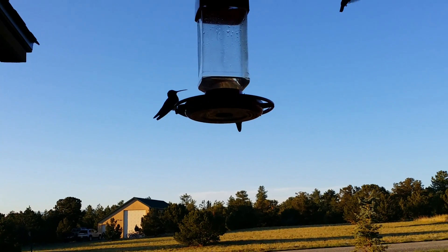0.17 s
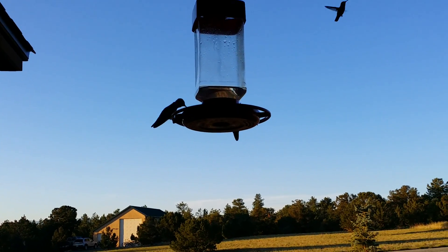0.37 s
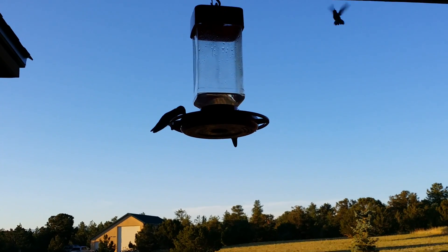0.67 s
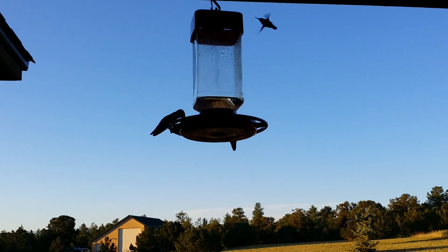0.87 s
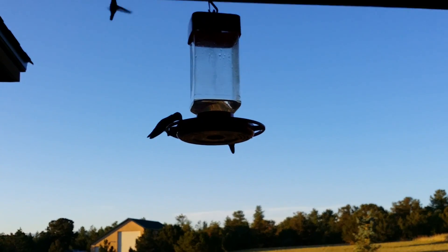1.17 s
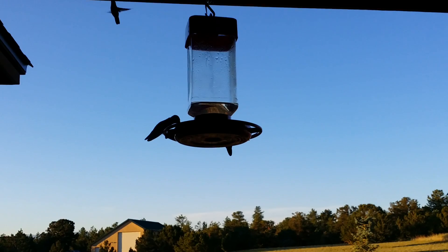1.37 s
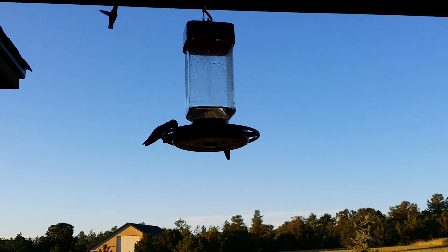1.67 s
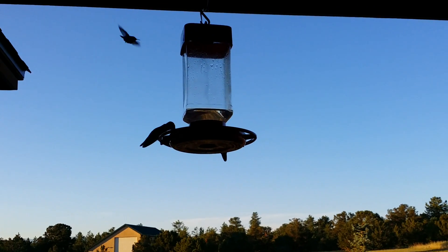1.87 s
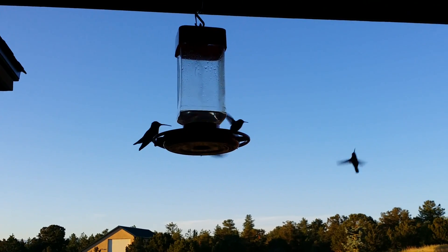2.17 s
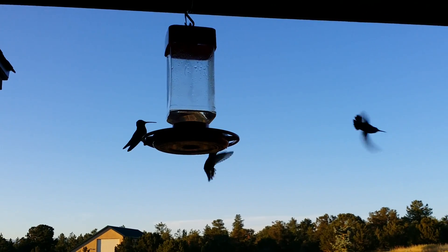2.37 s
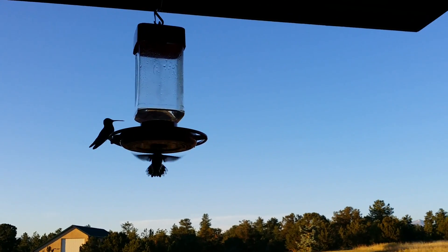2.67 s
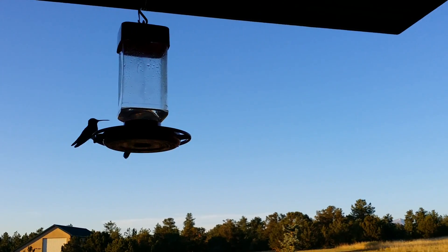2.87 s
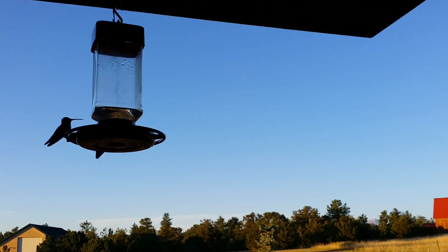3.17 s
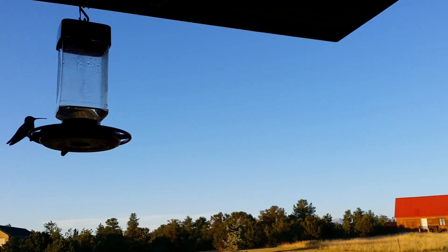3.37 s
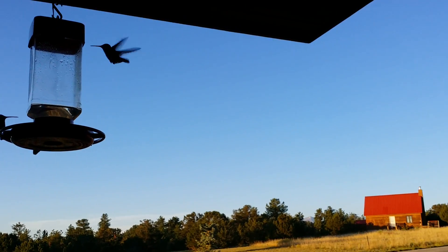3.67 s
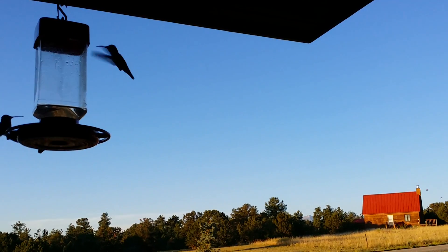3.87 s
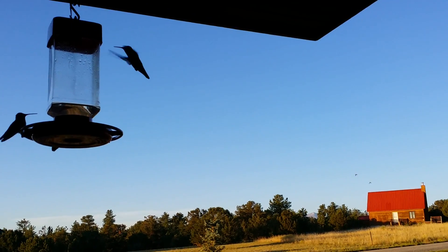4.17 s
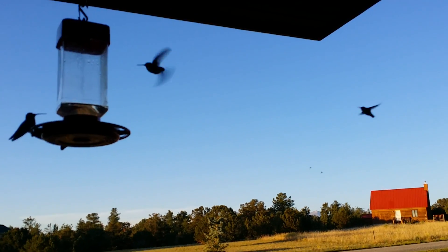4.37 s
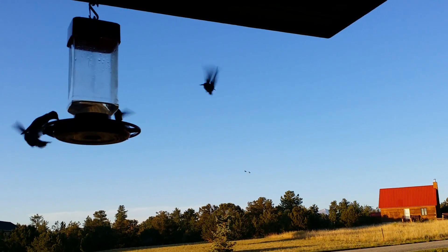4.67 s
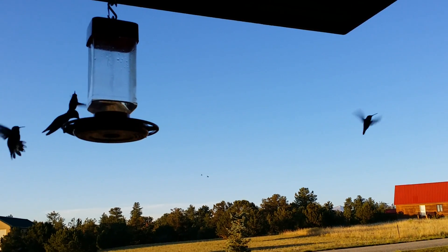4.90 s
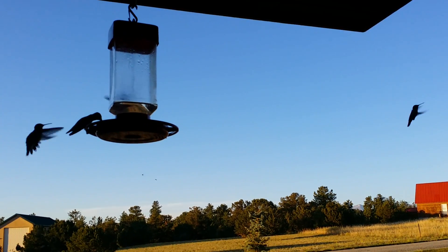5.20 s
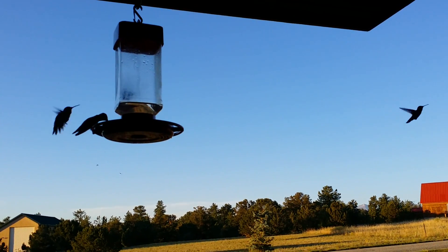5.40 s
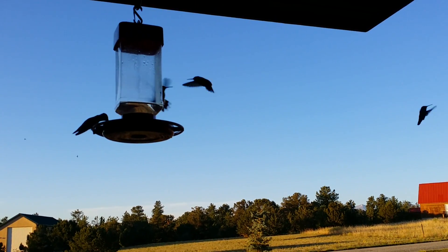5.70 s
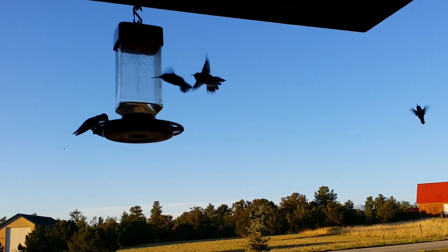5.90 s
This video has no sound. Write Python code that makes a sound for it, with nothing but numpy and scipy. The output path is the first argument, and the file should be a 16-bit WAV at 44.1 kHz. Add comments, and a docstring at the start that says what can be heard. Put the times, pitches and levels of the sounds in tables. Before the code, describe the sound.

Several hummingbirds circle a feeder under a porch, heard close in stereo. At first the wing hum is fairly faint, a low buzzing throb near 50 beats a second, with small chips; it swells around 0.7 s as louder chips and buzzy trills begin, thickest from 0.65 to 1.75 s. The hum sinks near 1.8 s, then surges close at 2 s with a barely noticeable dull knock at 2.1 and gritty trills to 2.3. Bright falling chips follow at 2.65 and 2.8, with weaker ones after 3. The hum dips near 3.3, darts up at 3.45, then calls grow sparse. Two strong chips come at 4.35, tiny wing flicks at 4.6 and 4.75, and a sharp chip with a trill at 4.9. Low raspy twitters continue from 5.45 to 6 s while wings pulse in bursts and swish, rising at the end. Short porch reflections and a faint outdoor hush surround everything.

```python
"""Hummingbirds squabble round a feeder under a porch roof, close to a small stereo microphone. Their wings
hum near 52 beats a second, as overtones of each stroke, and the feathers swish as puffs of noise.
They call with falling chips and fast buzzy trills, swept harmonic tones that the porch boards throw back.
A few wing flicks and one dull knock are short bursts of noise; the quiet fields behind are a faint hush."""
import sys
import numpy as np
from scipy import signal
from scipy.fft import rfft, irfft, next_fast_len
from scipy.io import wavfile
from scipy.ndimage import uniform_filter1d

SR = 44100
rng = np.random.default_rng(int(sys.argv[2]) if len(sys.argv) > 2 else 0)


def output_pcm(signal):
    """Save a mono or channel-first signal as 16-bit PCM at the path in sys.argv[1].

    Samples are clipped to [-1, 1] before scaling.
    """
    pcm = np.clip(np.atleast_2d(signal).T, -1, 1) * 32767
    wavfile.write(sys.argv[1], SR, np.round(pcm).astype(np.int16))


N = 266496


def undb(db):
    """Decibels to gain."""
    return 10 ** (np.asarray(db) / 20)


def unit(x):
    """Scale to rms 1."""
    return x / np.sqrt(np.mean(x ** 2))


def curves(table):
    """Each column of a table, joined by straight lines in time."""
    s, *columns = np.transpose(table)
    return [np.interp(np.arange(N) / SR, s, c) for c in columns]


def colour(x, points):
    """Filter by a spectrum of (frequency [Hz], level [dB]) points, joined over log frequency."""
    hz, db = np.transpose(points)
    size = next_fast_len(N + 4096)  # spare room, so that the end does not wrap onto the start
    bins = np.maximum(np.arange(size // 2 + 1) * SR / size, 1)
    gain = undb(np.interp(np.log(bins), np.log(hz), db))
    return irfft(rfft(x, size) * gain, size)[..., :N]


def walk(rate, size=N):
    """Smooth chance that turns about rate times a second; spread near 1."""
    k = max(int(SR / rate), 1)
    steps = np.repeat(rng.standard_normal(N // k + 2), k)[:size]
    return np.sqrt(2) * uniform_filter1d(uniform_filter1d(steps, k), k)


def add(track, s, sound):
    """Mix a sound into a track at time s."""
    start = max(int(s * SR), 0)
    track[..., start:start + sound.shape[-1]] += sound[..., :N - start]


def flight(churn_db=-4, swish_echo_db=0, hum_echo_db=-13, rival_swish=0.33):
    """The nearest bird darts; two rivals waver in wingbeat and roam from side to side of the microphone."""
    # the chase: (time [s], rivals and churned air against the nearest bird [dB],
    # sharpness of the stroke [dB per octave])
    chase_course = [(0, -2, 3), (.55, -3, 2), (1.1, 0.5, 0.5), (1.6, 0, -0.5), (2.15, -2.5, 1),
                    (2.4, -0.5, -1), (2.7, 0, 0.5), (3.05, -4.5, -0.5), (3.45, -9, -0.3), (4.2, -8, -1),
                    (4.6, 1.5, -1), (5, -1.5, -1.5), (6.04, 9.5, -1.5)]
    # the swish grows as the bird turns its spread wings to the microphone:
    # (time [s], swish [dB], snap of the feathers [dB])
    facing = [(0, -3.5, 8.5), (1.8, 1, 10.5), (2.1, 0, 8.5), (3.6, -2, 10), (3.9, 1, 12),
              (4.26, -3.5, 18.5), (4.45, 1.5, 3.5), (6.04, -1.5, 16)]
    # pressure of a rival's wing stroke: (frequency [Hz], relative level [dB])
    stroke_colour = [(38, -34), (52, -27), (110, -5.5), (155, 0.5), (185, -0.5), (210, -0.5), (240, -3.5),
                     (290, -5), (360, -9.5), (420, -6.5), (480, -15), (560, -28.5), (660, -25),
                     (800, -15.5), (1200, -50.5)]
    # rush of air through the feathers: (frequency [Hz], relative level [dB])
    swish_colour = [(300, 6.5), (700, 5.5), (1200, 2), (2000, -1), (4000, -1.5), (6000, 0), (8000, 5),
                    (11000, 2.5), (15000, 4)]
    base_swish_db, hum_ref_db = -52, -50  # swish level beside a hum of the reference level
    swish_per_hum, swish_per_chase = 1, 0.094  # dB of swish per dB of each
    hum_pan_db, roam_db = -2.5, 2  # left minus right: steady offset of all hum, spread of each rival

    hz, hum_db = darting()
    chase_db, tilt_db = curves(chase_course)
    facing_db, snap_db = curves(facing)
    swish_db = base_swish_db + facing_db
    swish_db = swish_db + swish_per_hum * (hum_db - hum_ref_db) + swish_per_chase * chase_db
    chase = undb(chase_db)
    sides = np.array([[1], [-1]])

    levels = overtones(hz)
    hum, swish = wingbeat(hz, tilt_db, unsteady=0.27, overtones_db=levels, snap_db=snap_db)
    for rival_hz in (51.5, 57.0):
        rival_hum, rival_puffs = wingbeat(rival_hz * (1 + .07 * walk(5)), tilt_db, unsteady=0.47,
                                          overtones_db=np.zeros(len(levels)), snap_db=10)
        roaming = undb(sides * roam_db * walk(2.98) / 2)
        hum = hum + chase * unit(colour(rival_hum, stroke_colour)) * roaming / np.sqrt(2)
        swish = swish + rival_swish * chase * rival_puffs / np.sqrt(2)

    # eddies roughen the hum while the birds chase each other; the sum is brought back to an even level
    churned = hum + chase * undb(churn_db) * eddies(tilt_db)
    hum = churned / np.sqrt(1 + chase ** 2 * (1 + undb(churn_db) ** 2))
    hum = hum * undb(hum_db)
    swish = unit(colour(swish / np.hypot(1, rival_swish * chase), swish_colour)) * undb(swish_db)
    echo = porch(undb(hum_echo_db) * hum.mean(axis=0) + undb(swish_echo_db) * swish)[:, :N]
    return hum * undb(sides * hum_pan_db / 2) + direct(swish) + echo


def darting():
    """Wingbeat [Hz] and hum level [dB] of the nearest bird: every dart lifts both above hovering."""
    # hovering as the bird comes and goes: (time [s], wingbeat [Hz], hum level apart from darts [dB])
    hover = [(0, 48.32, -63), (.55, 48.53, -65), (.76, 48.31, -53), (1.72, 47.42, -56), (1.79, 48.2, -65.5),
             (1.92, 51.41, -66), (2.02, 53.69, -50), (2.3, 52.46, -50.5), (2.5, 48.47, -49.5),
             (2.56, 55.7, -53), (2.8, 56.29, -52), (3.11, 51.95, -52.5), (3.29, 47.87, -71.5),
             (3.34, 53.32, -56.5), (3.87, 52.6, -53), (3.97, 51.13, -56.5), (4.22, 50.53, -59.5),
             (4.55, 50.96, -48.5), (5.1, 50.54, -57), (6.04, 49.88, -55)]
    # darts, short bursts of harder and faster strokes:
    # (middle [s], length [s], rise of wingbeat [Hz], rise of level [dB])
    darts = [ (0.679, 0.173, 5.06, 2), (1.115, .35, 4.5, 3), (2.162, 0.2435, 0.523, 5.5),
             (2.398, 0.0882, 5.21, 2), (2.593, 0.108, 2.09, 7.5), (2.706, 0.11, 0.93, 6.5),
             (3.44, 0.216, 7.36, 8.5), (4.35, 0.0911, 1.619, 3.5), (4.746, 0.2506, 4.29, 6.5),
             (4.955, 0.14396, 4.41, 8.5), (5.286, .12, 1.073, 2.5), (5.526, 0.12, 5.72, 4.5),
             (5.795, 0.1815, 2.186, 6.5), (6.012, 0.23, 0.857, 8.5)]
    squareness = 3.066  # 2 = a soft swell; higher = quick attack, hold, quick release
    beat_jitter = .011  # share by which the wingbeat wavers
    t = np.arange(N) / SR
    hz, hum_db = curves(hover)
    for middle, length, rise_hz, rise_db in darts:
        effort = np.exp(-np.abs(2 * (t - middle) / length) ** squareness)
        hz = hz + rise_hz * effort
        hum_db = hum_db + rise_db * effort
    return hz * (1 + beat_jitter * walk(22)), hum_db


def overtones(hz, fade_s=0.022):
    """Overtone levels [dB] of the nearest bird: they shift with wingbeat, and now and then one sings out."""
    # the stroke while hovering: (multiple of the wingbeat, relative level [dB])
    hovering = [(1, -35.5), (2, -8), (3, -10), (4, -0.5), (5, -9.5), (6, -11.5), (7, -16.5), (8, -9),
                (9, -18), (10, -24.5), (11, -40.5), (12, -27), (13, -28.5)]
    # the stroke at a sprint: (multiple of the wingbeat, relative level [dB])
    sprinting = [(1, -16.5), (2, -1), (3, -9), (4, 1), (5, -7.5), (6, -19), (7, -36.5), (8, -10),
                 (9, -22.5), (10, -18), (11, -7), (12, -17), (13, -22)]
    # one overtone sings out while a bird hovers close:
    # (start [s], end [s], multiple of the wingbeat, lift [dB])
    singing = [(0, 0.806, 8, 11.5), (0, 0.846, 5, 13), (0.82, 1.0, 3, 9.5), (0.901, 1.301, 8, 16.5),
               (0.982, 1.2, 2, 8.5), (0.98, 1.304, 4, 4), (1.36, 1.76, 3, 7), (2.059, 2.326, 4, 12),
               (2.083, 2.34, 8, 7.5), (2.55, 3.0, 8, 4.5), (2.557, 3.051, 6, 10.5), (2.559, 3.06, 10, 5.5),
               (2.848, 3.202, 2, 3.5), (2.89, 3.155, 4, 8.5), (3.548, 3.893, 4, 2.5), (3.947, 4.45, 3, 5.5),
               (4.636, 4.824, 4, 6), (4.9, 5.029, 8, 4.5), (5.102, 5.417, 4, 8.5), (5.92, 6.101, 2, 6)]
    hover_hz, sprint_hz = 50.96, 60.3  # wingbeats between which the one stroke turns into the other
    t = np.arange(N) / SR
    sprint = np.clip((hz - hover_hz) / (sprint_hz - hover_hz), 0, 1)
    levels = [slow + sprint * (fast - slow) for (_, slow), (_, fast) in zip(hovering, sprinting)]
    for start, end, multiple, db in singing:
        levels[round(multiple) - 1] += db * np.clip(np.minimum(t - start, end - t) / fade_s, 0, 1)
    return levels


def wingbeat(hz, tilt_db, unsteady, overtones_db, snap_db,
             puff_sharpness=2.68, upstroke=0.69, snap_spread_db=2, bass_tilt=2.13):
    """One bird: each stroke gives a pressure pulse of wavering harmonics, and both strokes puff out air."""
    # the snap of the feathers is brighter than their swish: (frequency [Hz], relative level [dB])
    snap_colour = [(3000, -11.5), (6000, -6), (8000, 0), (14000, 5), (17000, -20)]
    phase = 2 * np.pi * (np.cumsum(hz) / SR + rng.random())
    hum, power = 0, 0
    for k, db in enumerate(overtones_db, 1):
        # the tilt turns about the fourth harmonic and is steeper below it
        gain = undb(db + tilt_db * np.log2(k / 4) * (bass_tilt if k < 4 else 1))
        level_waver = 1 + unsteady * walk(9)
        hum = hum + gain * level_waver * np.cos(k * (phase + np.pi) + unsteady * walk(9))
        power = power + gain ** 2
    downstroke_puff = np.exp(puff_sharpness * np.cos(phase))
    upstroke_puff = upstroke * np.exp(-puff_sharpness * np.cos(phase))
    puffs = unit(downstroke_puff + upstroke_puff)
    # the feathers snap for about a millisecond once a beat, harder on some beats than on others
    snap_pulse = np.exp(40 * (np.cos(phase) - 1))
    snaps = snap_pulse * undb(snap_db + snap_spread_db * walk(50))
    rush = puffs * rng.standard_normal(N)
    return unit(hum / np.sqrt(power)), unit(rush + snaps * unit(colour(rng.standard_normal(N), snap_colour)))


def eddies(tilt_db):
    """Air churned by sharp turns: the sharper the stroke, the less deep rumble it leaves."""
    # eddies that a wing stroke sheds: (frequency [Hz], relative level [dB])
    eddy_colour = [(30, -44.5), (47, -44.5), (58, -2.5), (90, -11.5), (150, -1), (420, -6.5), (600, -18.5),
                   (1200, -22.5), (4000, -25.5)]
    rush = unit(colour(rng.standard_normal(N), eddy_colour))
    deep = colour(rush, [(110, 2), (220, -35)])
    return deep * undb(-2 * tilt_db) + (rush - deep)


def calls(echo_db=0.0, flick_s=0.000409, flick_echo_db=-3, gain_db=-2):
    """Chips, trills and wing flicks. Each comes from another spot and so has its own echoes;
    a bird that faces away is heard mostly by way of the porch. The nearest board doubles each chip."""
    # chips: (time [s], length [s], first pitch [Hz], last pitch [Hz], level before gain_db [dB],
    # step per overtone [dB], bend of the fall, shoulder (above 1 the pitch hangs before it falls),
    # change of effort over the fall [dB], pitch roughness [0-1], lag of the first slap [s],
    # porch echo against the call [dB])
    chips = [ (0.027, 0.0076, 7025, 2980, -59.5, -9.5, 2.1, 0.98, -2.5, 0.049, .004, -.5),
             (.15, 0.0129, 7560, 2787, -58, -4.5, 1.93, 1.05, -6, 0.108, .004, 7.5),
             (0.436, 0.0195, 6050, 2625, -48.5, -3.5, 2.9, 1.1, -11.5, 0.053, .004, -7.5),
             (.545, 0.017, 7745, 4325, -39, -3, 2.43, 1.118, -10.5, 0.059, .0052, -3),
             (0.582, 0.00925, 5910, 3146, -49, -11, 1.43, 1.2, -2, 0.032, .004, -4),
             (0.7577, 0.02076, 9410, 3874, -34.5, -3.5, 1.81, 1.35, -6, 0.032, .003, -2.5),
             (1.016, 0.016, 7500, 3910, -30.5, -3.5, 1.59, 1.094, -1.5, 0.0816, .0045, -1.5),
             (1.13, 0.0375, 4720, 2332, -39, -1, 3.215, 0.746, -5, 0.013, .0085, 1.5),
             (1.216, 0.011, 4918, 2863, -43.5, -1.5, 2.45, 1.12, 4, 0.041, 0.0071, 7),
             (1.468, 0.01077, 8216, 3104, -44.5, -6.5, 1.93, 0.94, -6, 0.099, .005, 8.5),
             (1.641, 0.00625, 5609, 3003, -47, -3, 1.19, 1, 3.5, 0.0001, .005, 7.5),
             (1.687, 0.0128, 7600, 2712, -36.5, -6, 3.56, 2.1, -4.5, 0, .005, 1.5),
             (1.882, 0.029, 7977, 2570, -41.5, -1.5, 1.59, 1.124, -8, 0.043, .0085, 3.5),
             (2.642, 0.02064, 8600, 4086, -32.5, -3.5, 2.006, 1.159, -1.5, 0.023, .0035, -4.5),
             (2.794, 0.0223, 7600, 3080, -34.5, -6, 2.99, 1.132, -2.5, 0.0404, .0045, -3),
             (3.074, 0.00795, 9560, 6840, -47, -14, 2.06, 0.987, -2.5, 0, .004, -2),
             (3.1, 0.02347, 7040, 2944, -43, -10.5, 2.48, 1.106, 1, 0.028, .004, -3),
             (3.222, 0.00827, 10330, 5327, -52, 1.5, 1.414, 1.08, 1, 0.185, .004, 5.5),
             (3.341, 0.01446, 6010, 2144, -46.5, -5, 2.004, 0.838, 2, 0.063, .004, -1),
             (3.815, 0.0185, 8438, 3893, -46, -3.5, 1.93, 0.987, -7.5, 0.031, .011, 3),
             (4.329, 0.017, 7993, 4160, -37.5, -6, 1.412, 1.04, 7.5, 0, .008, -1),
             (4.3585, 0.01487, 8500, 2345, -29, -1.5, 3.2, 1.5, -3, 0.013, .0037, -3.5),
             (4.8867, 0.0141, 9108, 3368, -31, -5.5, 2.13, 1.168, -9.5, 0.081, .004, -3.5)]
    # buzzy trills: (time [s], length [s], lowest pitch [Hz], highest pitch [Hz], swings [per s],
    # level before gain_db [dB], step per overtone [dB], sag of the low turns [0-1], swell [dB],
    # low turns against high [dB], opening pitch overshoot [0-1], rasp [0-1],
    # porch echo against the call [dB])
    trills = [ (0.659, 0.0654, 2312, 9950, 83, -42.5, -4, 0.07, -1, -4, 0.01, 0.06, -2),
              (0.85, 0.088, 1853, 4911, 76, -38, -4, 0.01, 9.5, -9.5, 0.05, 0.04, -2),
              (.998, 0.0255, 5860, 8610, 305, -30, -10, 0.16, 9.5, 3, 0.03, 0.06, -5.5),
              (1.236, 0.0582, 1915, 4525, 129.6, -45.5, -3, 0.2, -4, 4, 0, 0.14, -1.5),
              (1.323, 0.0578, 1703, 3953, 160, -47, -2, 0.08, 2.5, 8.5, 0.01, .08, 1),
              (1.435, 0.0813, 1801, 4004, 98.2, -45.5, -2.5, 0.03, -3.5, 0.5, 0.02, 0.19, 0),
              (1.65, 0.0367, 2467, 3032, 223, -43.5, -2.5, 0.09, -1.5, 2, 0.22, 0.01, 0),
              (1.698, 0.02, 2282, 3869, 159, -42.5, -1, 0.21, 0, -3.5, 0.02, 0, 2),
              (2.12, 0.0443, 1730, 3325, 164, -41.5, -2, 0.13, -6.5, 1.5, 0.2, 0.26, 0),
              (2.164, 0.033, 1783, 3210, 182, -35, -0.61, 0.13, 1, 3, 0.31, 0.11, -2),
              (2.262, 0.06454, 1620, 2388, 168, -30.5, -1, .38, -1, 2, .4, 0.04, -5),
              (4.75, 0.0264, 1496, 2632, 140, -39.5, -3, 0.01, -8, 12, 0.5, .1, -3),
              (4.892, 0.0783, 1585, 2952, 151, -40.5, -3, 0.09, -0.5, -2, 0.45, 0.16, -3),
              (5.465, 0.0743, 1584, 3168, 130, -48, -3.5, 0.09, 1.5, 5, 0.15, 0.12, -2.5),
              (5.634, 0.0876, 1549, 3287, 162, -46, -3.5, 0.08, 1.5, 4.5, 0.21, 0.07, -2),
              (5.783, 0.08, 1526, 3302, 125, -35.5, -2.5, 0.16, 3.5, 6, 0.8, 0.05, -5),
              (5.915, 0.0791, 1564, 3300, 143, -39, -3.5, 0.17, -2.5, -2, 0.86, 0.07, -3)]
    # wings that clip each other: (time [s], level at the onset [dB])
    flicks = [(4.604, -19.5), (4.607, -20), (4.756, -23)]
    slap_db = -9  # off the nearest board, against the direct chip

    near, echoes = np.zeros(N), np.zeros((2, N))
    for s, *shape, slap_s, porch_db in chips:
        call = undb(gain_db) * chip(*shape)
        add(near, s, call)
        add(near, s + slap_s, undb(slap_db) * call)
        add(echoes, s, undb(porch_db) * porch(call))
    for s, *shape, porch_db in trills:
        call = undb(gain_db) * trill(*shape)
        add(near, s, call)
        add(echoes, s, undb(porch_db) * porch(call))
    t = np.arange(SR // 100) / SR
    for s, db in flicks:
        bright_noise = unit(np.diff(rng.standard_normal(len(t) + 2), 2))
        flick = undb(db) * np.exp(-t / flick_s) * bright_noise
        add(near, s, flick)
        add(echoes, s, undb(flick_echo_db) * porch(flick))
    return direct(near) + undb(echo_db) * echoes


def chip(length, first_hz, last_hz, db, overtone_db, bend, shoulder, fade_db, waver,
         attack=0.0795, release=0.83, flutter_db=1.5, overrun=1.398):
    """The pitch drops steeply and flattens out; the tone turns ragged as the membranes slacken."""
    # attack, release and overrun are shares of the length; the call rings on past it
    u = np.arange(int(overrun * length * SR)) / (length * SR)
    fall = (np.exp(-bend * u ** shoulder) - np.exp(-bend)) / (1 - np.exp(-bend))
    raggedness = 1 + waver * np.sqrt(u) * walk(2500, size=len(u))
    hz = (last_hz + (first_hz - last_hz) * fall) * raggedness
    effort = undb(fade_db * u + flutter_db * walk(917, size=len(u)))
    envelope = effort * np.clip(u / attack, 0, 1) * np.clip((overrun - u) / release, 0, 1)
    return undb(db) * unit(syrinx(hz, overtone_db) * envelope)


def trill(length, low_hz, high_hz, rate, db, overtone_db, sag, swell_db, low_turn_db, lead, rasp,
          uneven=.26, edge_s=0.00055, flutter_db=2.0, lead_s=0.001504, linger=1.4):
    """The pitch drops in, then swings up and down unevenly; the call swells or sinks towards its middle."""
    even_rate = 112  # swings per s: a slower swing lingers at the top, a faster one at the bottom
    size = int(length * SR)
    t = np.arange(size) / SR
    swing = np.cos(2 * np.pi * np.cumsum(rate * (1 + uneven * walk(120, size=size))) / SR)
    dip = ((1 - swing) / 2) ** max((even_rate / rate) ** linger, .55)
    # the low turns sink as the call runs out of air
    bottom_hz = low_hz * (1 + sag * (.5 - t / length))
    hz = high_hz * (bottom_hz / high_hz) ** dip
    hz = hz * (1 + rasp * walk(1200, size=size)) * (1 + lead * np.exp(-t / lead_s))
    swell = swell_db * np.sin(np.pi * t / length)
    effort = undb(swell + low_turn_db * dip + flutter_db * walk(132.5, size=size))
    edges = np.clip(np.minimum(t, length - t) / edge_s, 0, 1)
    return undb(db) * unit(syrinx(hz, overtone_db) * edges * effort)


def syrinx(hz, overtone_db):
    """A harmonic tone whose partials rise and fall in level as they cross the throat's resonance."""
    # what the throat and open bill let through: (frequency [Hz], level [dB])
    throat = [(1100, -28), (1600, -7.5), (2500, -7), (4000, -7), (5500, -2), (7200, 5), (9000, 3),
              (11500, 1), (15000, -4.5)]
    phase = 2 * np.pi * np.cumsum(hz) / SR
    throat_hz, throat_db = np.transpose(throat)
    k = np.arange(1, 10)[:, None]
    gain = undb(np.interp(np.log(k * hz), np.log(throat_hz), throat_db) + (k - 1) * overtone_db)
    audible = k * hz < SR / 2
    partials = gain * audible * np.sin(k * phase + 2 * np.pi * rng.random(k.shape))
    return unit(np.sum(partials, axis=0))


def direct(x):
    """Straight path to the two ports: the left one is shaded and three samples earlier."""
    # the left port faces away from the birds: (frequency [Hz], left against right [dB])
    shadow = [(400, -29), (2000, -35), (5000, -4), (7000, -50), (9000, -41), (14000, -40.5)]
    return np.array([np.roll(colour(x, shadow), -3), x])


def porch(x, early_s=0.02185, late_db=-11, gap_s=0.00186):
    """Separate slaps from roof and wall, then a faint diffuse tail; each port hears its own."""
    t60_s = .3  # time for the diffuse tail to fall by 60 dB
    t = np.arange(SR // 3) / SR
    slaps = np.sign(rng.standard_normal((2, len(t)))) * (rng.random((2, len(t))) < .05)
    early = unit(slaps * np.exp(-t / early_s))
    late = unit(rng.standard_normal((2, len(t))) * np.exp(-np.log(1000) * t / t60_s))
    # no reflection arrives before half the gap; they come in fully after one and a half
    arrival = np.clip(t / gap_s - .5, 0, 1)
    spectrum = rfft((early + undb(late_db) * late) * arrival, 2 * len(t))
    # flat boards favour no broad band over another
    spectrum /= np.sqrt(uniform_filter1d(np.abs(spectrum) ** 2, size=300, axis=1))
    return signal.fftconvolve(x[None], irfft(spectrum)[:, :len(t)], axes=1)


def knock():
    """One soft, dull knock, a decaying burst of noise, perhaps a bird bumping the feeder."""
    # colour of the knock: (frequency [Hz], relative level [dB])
    knock_colour = [(350, -25), (650, -1.5), (1300, 7), (2000, -24)]
    knock_s, knock_db, decay_s = 2.1, -51, .008  # time, level at the onset, decay
    t = np.arange(N) / SR - knock_s
    envelope = (t > 0) * np.exp(-np.abs(t) / decay_s)
    return undb(knock_db) * envelope * unit(colour(rng.standard_normal(N), knock_colour))


def air(sway_db=1):
    """Still air over the fields: a faint hush that sways slightly, more alike on both sides in the bass."""
    # the hush: (frequency [Hz], relative level per Hz [dB])
    air_colour = [(25, -19), (70, -4.5), (120, 0.5), (400, -8), (800, -18.5), (2000, -19.5), (4400, -22),
                  (6500, -22.5), (11000, -17), (15000, -26.5)]
    air_db = -68  # level of the part that both sides share
    mid = colour(rng.standard_normal(N), air_colour)
    side = colour(colour(rng.standard_normal(N), air_colour), [(200, -7.0), (1500, 1.5)])
    return undb(air_db + sway_db * walk(5.56)) * np.array([mid + side, mid - side]) / np.std(mid)


def scene():
    """Wings and calls over the quiet of the fields."""
    return flight() + calls() + knock() + air()


def record(dry):
    """Each port of the microphone colours the sound; the top is cut steeply."""
    # colour of the left port: (frequency [Hz], level [dB])
    left_port = [(1000, 0), (4000, -2), (6700, 0), (8300, -8), (10000, -9.5), (12000, -8.5), (15000, -12.5)]
    # colour of the right port: (frequency [Hz], level [dB])
    right_port = [(1000, 0), (4000, -1.5), (6700, 1.5), (8300, 3), (9800, -2.5), (11300, 3), (15000, -9)]
    top_hz = 14800
    heard = np.array([colour(dry[0], left_port), colour(dry[1], right_port)])
    return signal.sosfilt(signal.ellip(10, .2, 80, top_hz, fs=SR, output="sos"), heard)


dry = scene()
out = record(dry)
output_pcm(out)
```